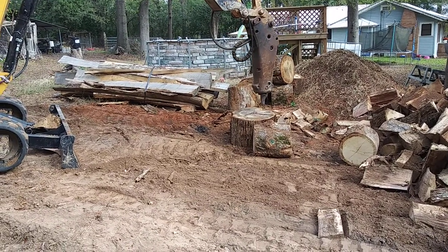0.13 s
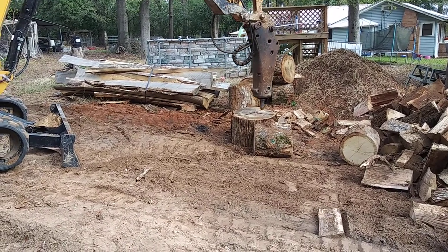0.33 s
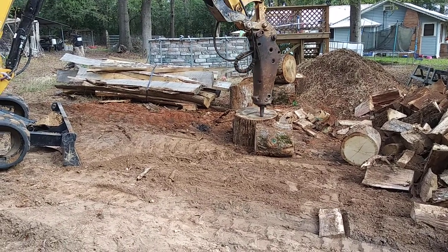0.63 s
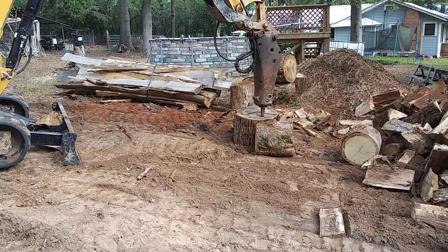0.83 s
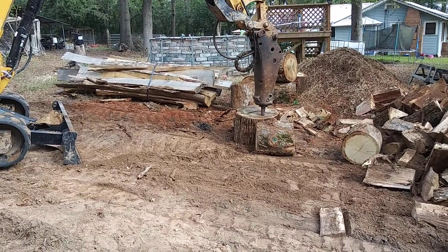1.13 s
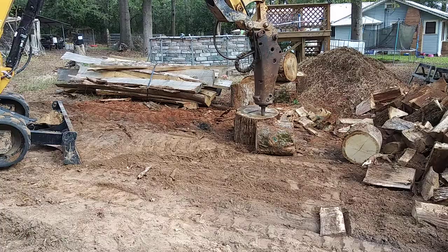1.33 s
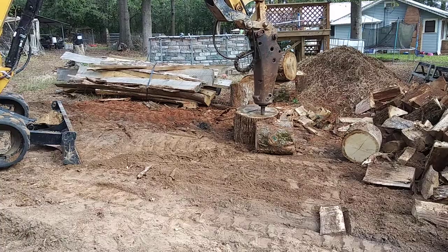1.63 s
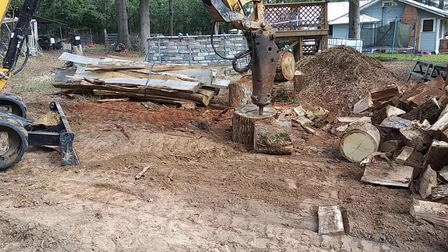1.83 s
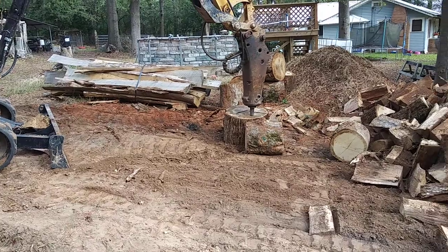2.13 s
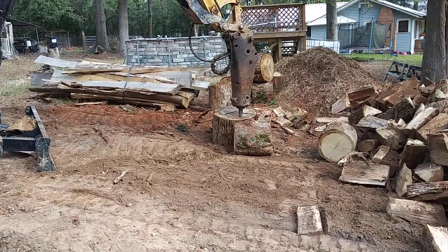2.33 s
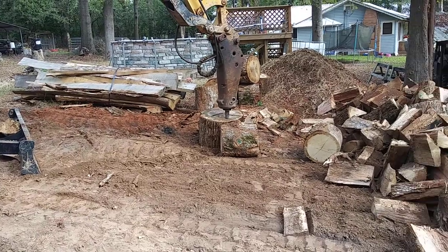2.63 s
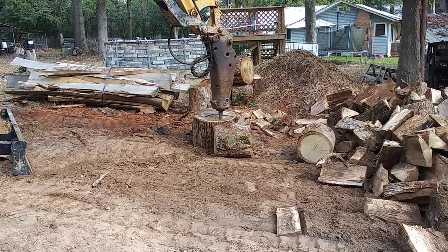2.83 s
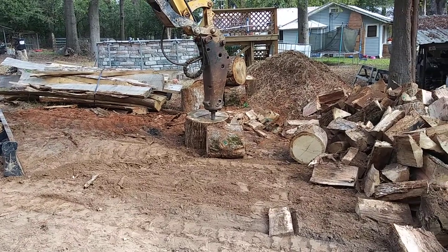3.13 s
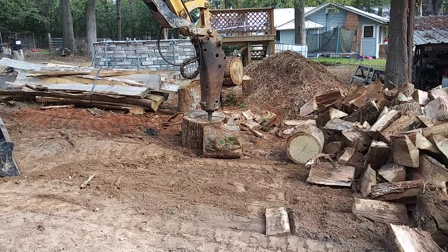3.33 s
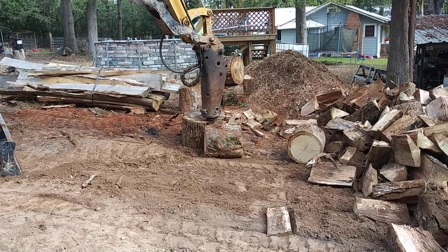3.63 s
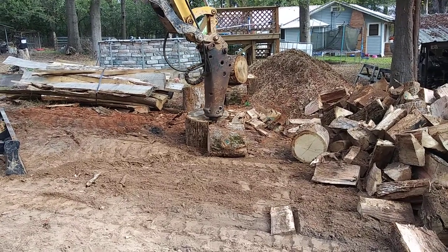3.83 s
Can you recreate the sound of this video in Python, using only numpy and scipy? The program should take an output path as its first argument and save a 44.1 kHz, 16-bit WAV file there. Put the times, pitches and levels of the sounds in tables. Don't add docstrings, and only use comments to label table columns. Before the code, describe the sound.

A hydraulic breaker on an excavator clanks loosely over a diesel idle, then hammers a log about fourteen times a second until wood tears and a piece thuds down; open yard, phone microphone clipping.

```python
import sys
import numpy as np
from scipy import signal
from scipy.fft import rfft, irfft, next_fast_len
from scipy.io import wavfile
from scipy.ndimage import map_coordinates

SR = 44100
rng = np.random.default_rng(int(sys.argv[2]) if len(sys.argv) > 2 else 0)


def elevation(decibels):
    levels = np.asarray(decibels, float)
    return 10 ** (levels / 20)


def wav_out(sig):
    wavfile.write(sys.argv[1], SR, np.round(np.clip(np.atleast_2d(sig).T, -1, 1) * 32767).astype(np.int16))


N = 176400
T = np.arange(N) / SR


def unit(x):
    return x / np.sqrt(np.mean(x ** 2) + 1e-20)


def filtered(x, response):
    m = next_fast_len(N + SR // 2)
    return irfft(rfft(x, m) * response(np.fft.rfftfreq(m, 1 / SR)), m)[:N]


def noise(points):
    f, db = np.transpose(points)
    colour = lambda hz: elevation(np.interp(np.log(hz + 1), np.log(f + 1), db))
    return unit(filtered(rng.standard_normal(N), colour))


def wobble(rate):
    return map_coordinates(rng.standard_normal(int(N * rate / SR) + 4), [T * rate])


def peak(f, hz, width):
    return 1j * f * width / (hz * hz - f * f + 1j * f * width)


def rings(x, modes):
    def response(f):
        total = 0
        for k, (hz, db, t60) in enumerate(modes):
            width = np.log(1000) / np.pi / t60
            total = total + (-1) ** k * elevation(db) * peak(f, hz, width) * np.sqrt(SR / width / 10)
        return total
    return filtered(x, response)


def bursts(times, levels_db, attack, t60):
    t = np.arange(SR // 2) / SR
    marks = np.bincount(np.clip(np.round(times * SR).astype(int), 0, N - 1), elevation(levels_db), N)
    shape = (1 - np.exp(-t / attack)) * elevation(-60 * t / t60)
    return np.abs(signal.fftconvolve(marks, shape)[:N])


def struck(times, levels_db, modes, swell, rough, stop_s=1):
    t, out = np.arange(SR // 6) / SR, np.zeros(N + SR)
    hz, db, t60 = np.transpose(modes)[..., None]
    scatter_db, detune = 1.5, .006 * np.minimum(1, rough * 200)
    chance = rng.standard_normal((len(times), 3, len(modes), 1))
    for s, level, (a, b, c) in zip(times, levels_db, chance):
        steps = np.repeat(rng.standard_normal((len(modes), len(t) // 10)), 10, axis=1)
        wander = steps.cumsum(1) * np.sqrt(2 * np.pi * rough * hz / SR / 10)
        tone = np.sin(2 * np.pi * hz * (1 + detune * b) * t + 3 * c + wander)
        ring = elevation(level + db + scatter_db * a - 60 * t / t60) * tone
        damped = np.clip((stop_s - t) * 200, 0, 1)
        out[round(s * SR):][:len(t)] += ring.sum(0) * (1 - np.exp(-t / swell)) * damped
    return out[:N]


# (time [s], engine level [dB], pump hiss level [dB])
ENGINE = [(0.0, -33, -36.5), (0.19, -35, -39.5), (0.39, -35, -37), (0.568, -31, -30.5), (0.68, -27.5, -38),
          (0.85, -33, -39), (1.046, -33, -39.5), (1.2, -33.5, -47)]
# (frequency [Hz], level [dB per Hz])
BLOCK = [(26, -55), (52, -30), (66, -8), (157, -12), (201, -3), (296, -18), (402, -8), (1000, -10.5),
         (1800, -9.5), (2500, -14), (3000, -22), (6000, -25), (12000, -90)]
# (frequency [Hz], level [dB per Hz])
HISS = [(3000, -14), (5500, -10.5), (6800, -2), (7500, -5), (8020, 7), (8400, -9.5), (10000, -17.5),
        (15800, -34)]
# (frequency [Hz], rms level [dB], width [Hz])
WHINES = [(213, -50, 14), (400.6, -46, 11), (547, -47, 6.5), (762, -47.5, 47), (1750, -47, 43)]
# (time [s], frequency [Hz], width [Hz], level [dB], 60 dB decay time [s])
VALVE = (1.078, 15100, 500, -55, .6)


def engine():
    firing_hz, knock = 71, 0.19
    s, block_db, hiss_db = np.transpose(ENGINE)
    level = elevation(np.interp(T, s, block_db) + 0.5 + 0.2 * wobble(18))
    firing = 1 + knock * np.cos(2 * np.pi * firing_hz * T + .5 * wobble(9.4))
    out = level * firing * noise(BLOCK)

    def narrow(hz, width):
        return unit(filtered(rng.standard_normal(N), lambda f: peak(f, hz, width) ** 2))

    for hz, db, width in WHINES:
        out += elevation(db) * narrow(hz, width)
    out += elevation(np.interp(T, s, hiss_db) + 0.6 * wobble(20)) * noise(HISS)
    at, hz, width, db, t60 = VALVE
    return out + bursts(np.array([at]), np.array([db]), .002, t60) * narrow(hz, width)


# (frequency [Hz], 60 dB decay time [s])
YARD = [(200, 0.76), (2000, 0.91), (8000, 1), (14000, 0.058)]


def yard(x, longest):
    hz, t, z = signal.stft(rng.standard_normal(SR), SR, nperseg=256)
    f, t60 = np.transpose(YARD)
    decay = np.minimum(np.interp(hz, f, t60), longest)[:, None]
    tail = signal.istft(z * elevation(-60 * t / decay), SR, nperseg=256)[1]
    delayed = np.pad(x, (700, 0))
    return signal.fftconvolve(delayed, tail / np.linalg.norm(tail))[:N]


# (time [s], level [dB], frequency [Hz], 60 dB decay time [s])
THUMP = (3.707, -7, 205, 0.06)
# (time [s], peak level [dB], ring frequency [Hz], wood level [dB], bush level [dB])
CLANKS = [(0.219, -23.5, 1470, -9, -7), (0.543, 2, 4500, -7.5, -2), (0.567, -4, 2070, -3, 0),
          (0.597, -13.5, 1950, 6.5, -14), (0.6537, -9, 2450, -7, 1), (0.6876, -11, 7760, -18, -12),
          (0.761, -19.5, 7300, 0, -4), (0.809, -18, 3880, -0.5, -3), (0.876, -29, 1630, -9, -5),
          (0.9095, -29, 2170, -7, -9), (0.962, -10, 1990, 0, -1.5), (1.0445, -16, 1840, -4, -3),
          (1.068, -23.5, 3100, 8.5, 6), (1.08, -26, 2380, -14, -10), (3.792, -2.5, 2370, -2.5, -18),
          (3.9894, -13, 3850, -28, -6)]
# (frequency [Hz], level [dB], 60 dB decay time [s])
BUSH = [(2180, -2.5, 0.035), (3280, -10.5, 0.035), (7300, -8.5, 0.047), (7780, -12, 0.04)]
# (frequency [Hz], level [dB], 60 dB decay time [s])
KNOCKED_LOG = [(229, -5.5, 0.053), (345, -8, 0.035), (503, -3, 0.084), (592, -4, .08), (760, -7, 0.036),
               (1140, -8, 0.042)]
# (frequency [Hz], level [dB per Hz])
CLANK = [(100, -43), (300, -13), (600, -6.5), (2000, 1.5), (4500, -4), (8000, -18.5), (9500, -24.5),
         (15800, -32)]


def clanks():
    s, db, hz, t60 = THUMP
    out = struck([s], [db], [(hz, 0, t60)], 0.0017, rough=0.0073)
    s, db, pitch_hz, wood_db, bush_db = np.transpose(CLANKS)
    for at, level, hz in zip(s, db, pitch_hz):
        out += struck([at], [level - 3], [(hz, 0, 0.065)], 0.0015, rough=0.035)
    out += struck(s, db + bush_db - 2, BUSH, 0.0013, rough=0.017)
    scrape = bursts(s, db + wood_db, 0.00067, t60=0.073) * rng.standard_normal(N)
    out += rings(scrape, KNOCKED_LOG)
    return out + bursts(s, db - 4.5, 0.0013, t60=.035) * noise(CLANK)


# (time [s], level [dB])
SPLIT = [(2.9, -21), (3.258, -16), (3.61, -13), (3.679, -10), (3.842, -18), (4.0, -28.5)]
# (frequency [Hz], level [dB])
TEAR = [(120, -19), (250, 4), (600, 6.5), (1200, 3), (3000, -2), (8000, -4), (10000, -35)]


def splitting():
    tears_per_s, split_db = 1700, -3.5
    s, db = np.transpose(SPLIT)
    snaps = (rng.random(N) < tears_per_s / SR) * elevation(3.6 * rng.exponential(size=N))
    clumps = signal.fftconvolve(snaps, elevation(-60 * T[:900] / 0.013))[:N]
    grain = unit(clumps * noise(TEAR))
    floor = elevation(db[0]) ** 2 * (T < s[-1] - .2)
    power = elevation(np.interp(T, s, db)) ** 2 - floor
    gain = np.sqrt(np.maximum(power, 0)) * (T > s[0])
    return elevation(split_db + 2.5 * wobble(24.78)) * gain * grain


# (frequency [Hz], level [dB per Hz])
CRASH = [(24, -60), (40, -16), (311, -7), (500, -4), (868, -4.5), (1980, -3), (5960, -13.5), (7840, -29.5),
         (15800, -114)]
# (frequency [Hz], level [dB])
FIZZ = [(8000, -39), (9500, 1), (12000, 2), (15800, -7.5)]
# (delay [s], level [dB], frequency [Hz], 60 dB decay time [s], swell [s])
THUD = (.05, -27, 80, -19, -2)


def crash(s, force):
    delay, thud_db, hz, t60, swell = THUD
    out = bursts(s, force - 10, 0.00042, t60=0.23) * noise(CRASH)
    out += struck(s + delay, force + thud_db, [(hz, 0, t60)], abs(swell), rough=.1)
    return out + bursts(s, force - 18, 0.00055, t60=0.12) * noise(FIZZ)


# (time [s], tool level [dB], bite level [dB], housing level [dB], wood level [dB])
RUN_UP = [(1.2099, 1.5, 1, 3, -1), (1.2856, -1, 3.5, -0.5, 3), (1.3611, 0, 2, -2.5, 4.5),
          (1.4349, 0.5, -2.0, 3.5, 5.5), (1.5104, 0, 4, -4, 2), (1.5864, 1.0, 0, -2, -4.5),
          (1.6639, 1.5, 4, 2.5, 4.5), (1.7384, -1.5, -4, 4, 2), (1.8116, 0, 6, 3, 5.5),
          (1.8846, -1, -1.5, 3, 1), (1.9572, 0, 3, 0.5, 1.5), (2.03, -1, -10, 4, 2.5),
          (2.1034, -0.5, 0, 2.5, 0.5), (2.173, 0, -0.5, -1, 3), (2.247, 0, -7.0, 2, 4),
          (2.3192, 0, -6, 4.0, 2), (2.39, 0.5, -12, 0, 0), (2.4605, 0.5, -10, 6, -0.5)]
FULL_RATE = [(2.53, -0.5, 4, 0.5, 2.5), (2.6002, 0.5, -12, 4, -2), (2.671, 0, 5, 3, -1),
             (2.7385, -0.0, -1, 4, 2), (2.8087, -0.5, -11, 5.0, 3), (2.8776, 1.5, 3.5, -2.5, 2),
             (2.9473, 0, 1.5, 3, 0.5), (3.017, 1.0, 2, 3, 3), (3.0865, -1.0, -5, -0.5, 4.5),
             (3.1562, -0.0, 6.5, -1, 6.5), (3.2268, -0.5, 2, -1.5, 6.5), (3.2969, -0.5, 3, 0, 3),
             (3.3674, -0.5, 2, -2.5, 3.5), (3.4363, 1, -15, -1, 2.5), (3.506, 0.5, 5.5, -2.5, 1),
             (3.576, -0.0, -6.0, 0, 2), (3.6465, 1.0, -2.0, 4.5, -2.5), (3.7187, 2, -6, 1, -1),
             (3.7885, -6.5, -12.0, -5, -6.5)]
# (frequency [Hz], level [dB], 60 dB decay time [s])
TOOL = [(4243, 0.5, 0.078), (4683, 5.5, 0.055), (5170, -8, 0.25), (6890, -2, 0.12), (7680, -1.5, 0.43),
        (7980, 3, 0.084)]
BITE = [(2460, -11.5, 0.14), (3194, 4.5, 0.029)]
HOUSING = [(1903, -9, 0.17), (1968.5, 0.5, 0.054), (2040, -4, 0.085), (2349, -13, 0.16),
           (2508, -6.5, 0.053)]
LOG = [(233.3, -10, 0.11), (370, -10.5, 0.12), (451.4, -1.5, 0.076), (504.6, -2.5, 0.15),
       (591.3, -3.5, 0.14), (660.4, -3.5, 0.11), (767, -14.5, 0.26), (995.4, -5, 0.084), (1173, 0.5, 0.074)]
PISTON = [(4470, 2, 0.046), (7300, 0, 0.25), (7290, -3.5, 0.24), (4660, -6, 0.22)]
BACK_STOP = [(1783, -11.5, 0.12), (2003, -1, 0.12), (2310, -5.5, 0.3), (4417, -5, 0.4), (680, 3.5, 0.038)]
HUM = [(6325, 1, 0.29), (11140, -14.5, 0.24), (12400, -33, 0.14)]
WHOLE_LOG = [(501, 0, 0.16)]
DELAY_S = [0, .006, .009, .011, .024, .039, .013]
SWELL_S = [.0015, .002, .002, .008, .003, .003, .012]
RING_DB = [-11.5, -7, -3.5, -8.5, -15, -11, -14.5]
ROUGH = [.03, .02, .012, .004, .03, .03, .001]


def breaker():
    blow_db, rattle_db, scatter_s = -2.5, -17.5, .001
    s, *levels = np.transpose(RUN_UP + FULL_RATE)
    force, bite, housing, wood = np.array(levels) + blow_db
    out = crash(s, force)
    whole_db = wood - 7 - 10.5 * (s - s[0])
    out += struck(s + DELAY_S[3], whole_db, WHOLE_LOG, SWELL_S[3], rough=0.0017)
    hum = force - 12 * np.maximum(s - 3.2, 0)
    drives = [force, bite, housing, wood, force, force, hum]
    bodies = [TOOL, BITE, HOUSING, LOG, PISTON, BACK_STOP, HUM]
    for delay, swell, ring_db, rough, db, modes in zip(DELAY_S, SWELL_S, RING_DB, ROUGH, drives, bodies):
        late = s + delay + scatter_s * rng.standard_normal(len(s)) * (delay > 0)
        stop_s = .054 if modes is HUM else 1
        out += struck(late, db + ring_db, modes, swell, rough, stop_s)
        rattle = bursts(late, db + ring_db + rattle_db, swell, t60=0.091) * rng.standard_normal(N)
        out += rings(rattle, modes)
    return out


def scene():
    loud, light = breaker() + splitting(), clanks()
    near = elevation(-12) * yard(light, longest=.22)
    far = elevation(-11) * yard(loud, longest=2)
    return (loud + light + far + near + engine())[None]


def band_limit(x):
    return signal.sosfilt(signal.butter(12, 16620, fs=SR, output="sos"), x)


def record(dry):
    low_cut_hz, top_hz, air_hz, air_db_per_khz = 61, 15950, 9000, -6
    ceiling, hard = .71, 6
    x = filtered(dry[0], lambda f: (1j * f / (low_cut_hz + 1j * f)) ** 3)
    x = x / (1 + np.abs(x / ceiling) ** hard) ** (1 / hard)
    dull = lambda f: (f < top_hz) * elevation(air_db_per_khz * np.clip((f - air_hz) / 1000, 0, 1))
    return band_limit(filtered(x, dull)[None])


dry = scene()
out = record(dry)
wav_out(out)
```